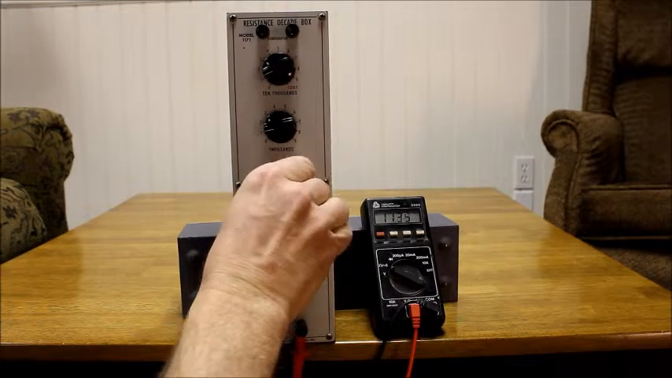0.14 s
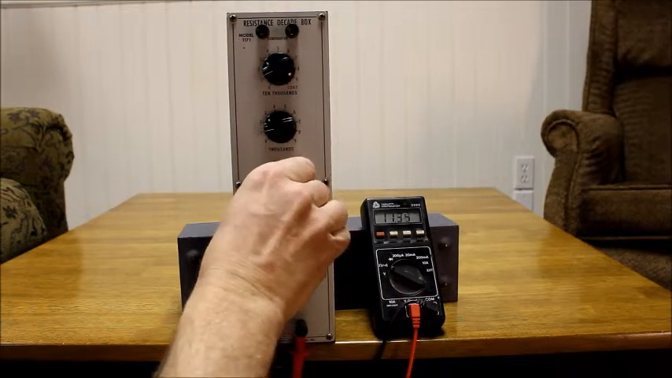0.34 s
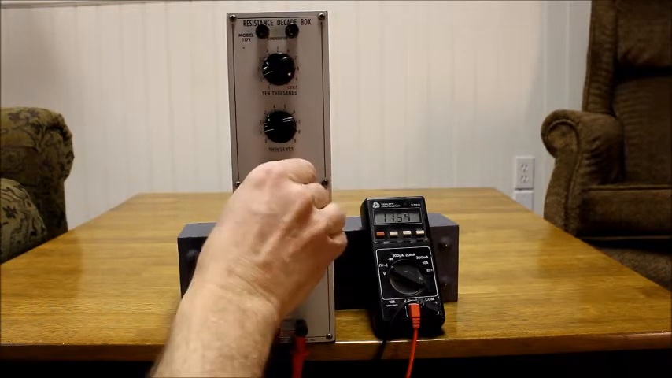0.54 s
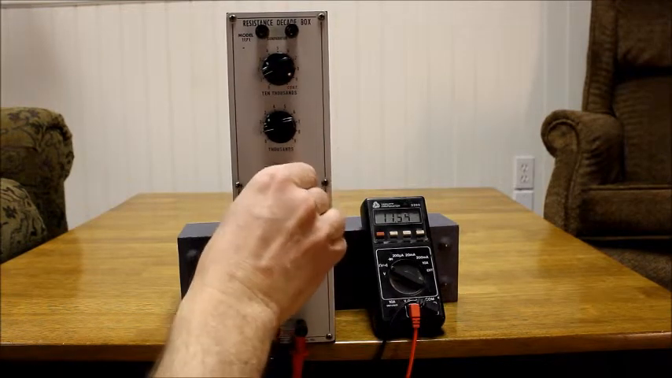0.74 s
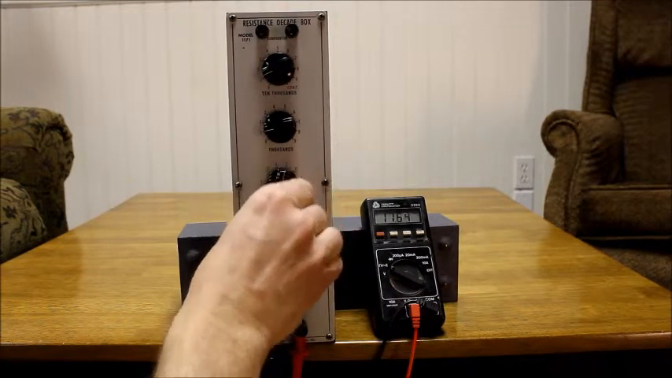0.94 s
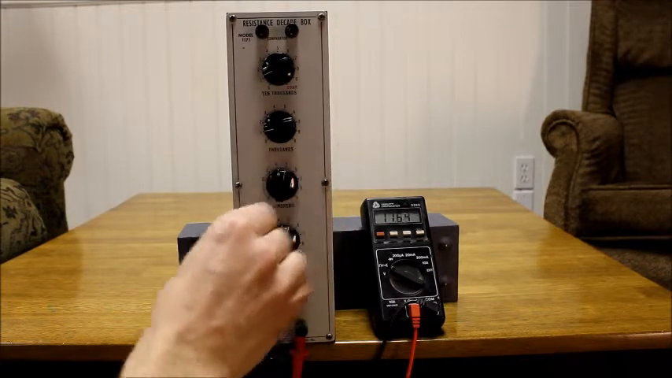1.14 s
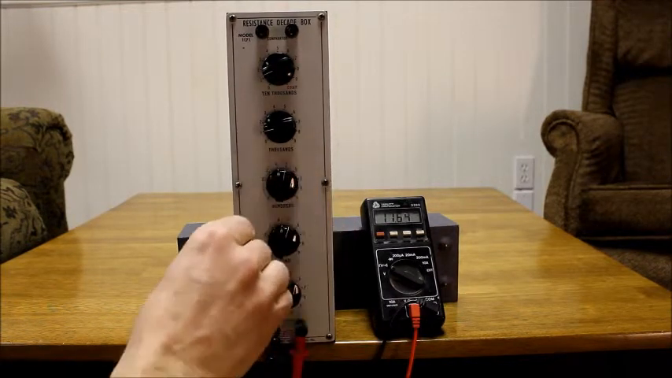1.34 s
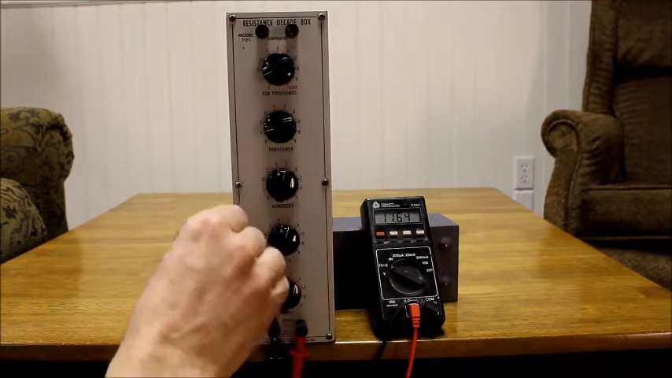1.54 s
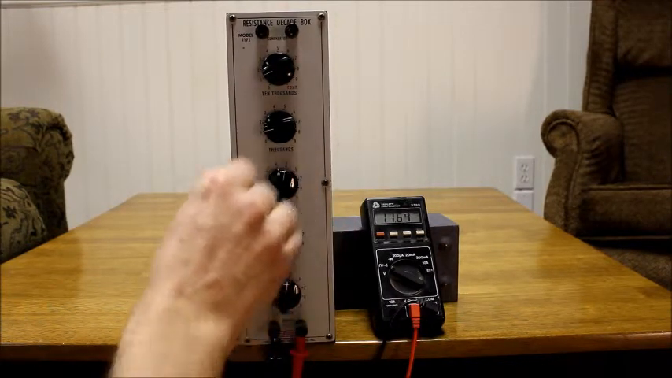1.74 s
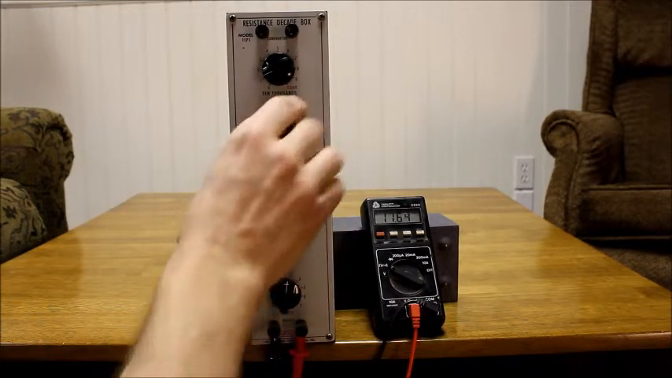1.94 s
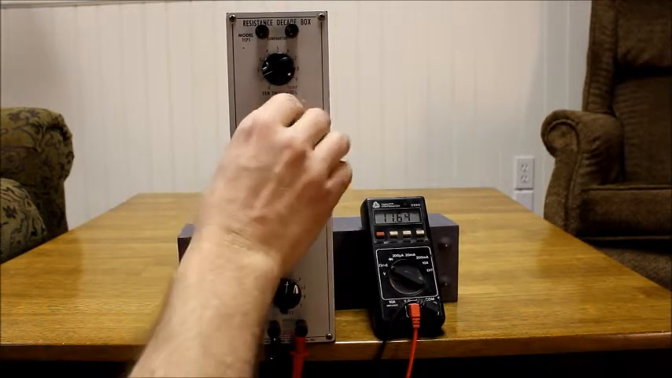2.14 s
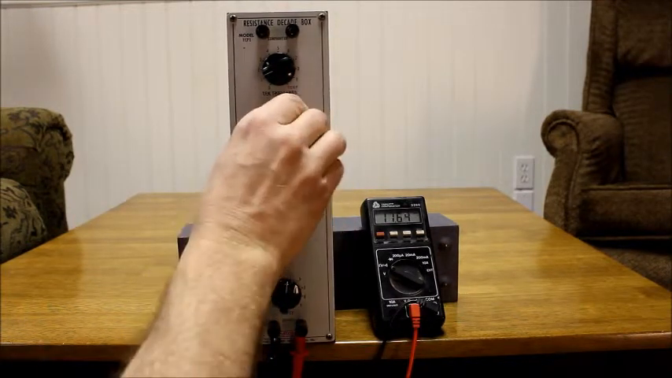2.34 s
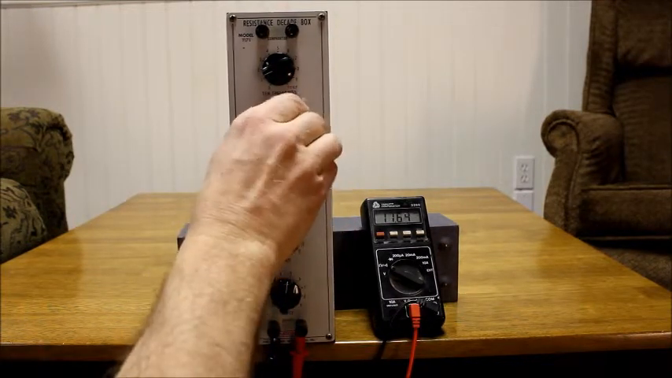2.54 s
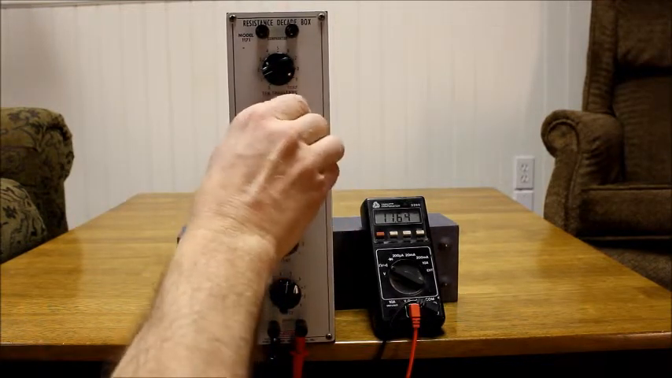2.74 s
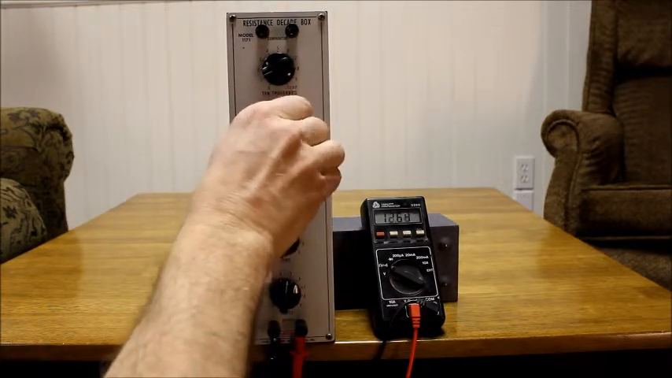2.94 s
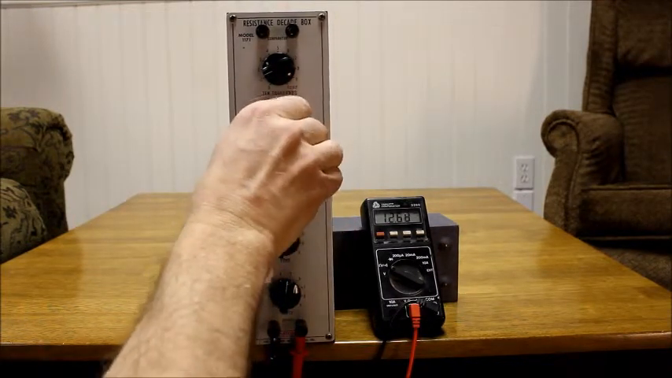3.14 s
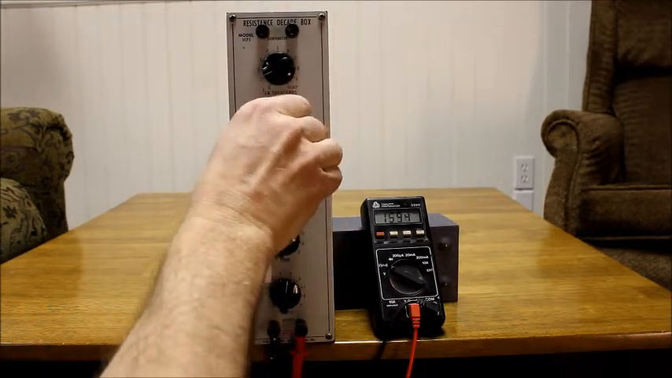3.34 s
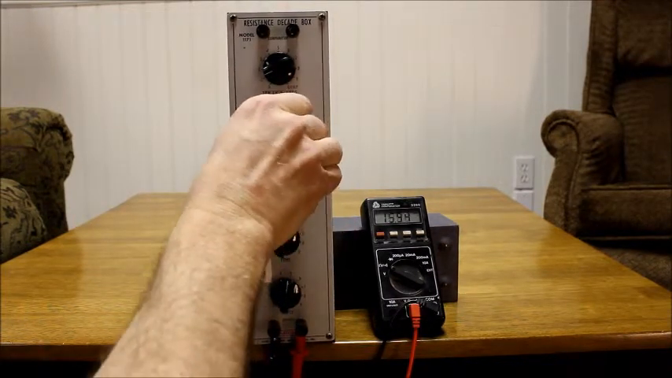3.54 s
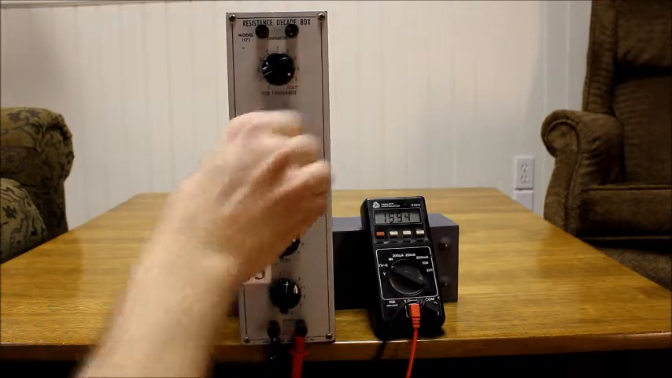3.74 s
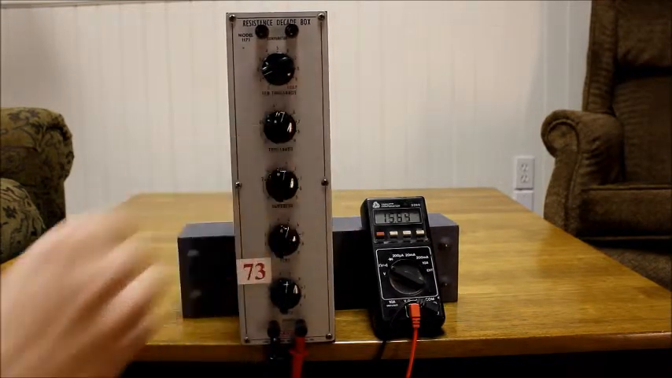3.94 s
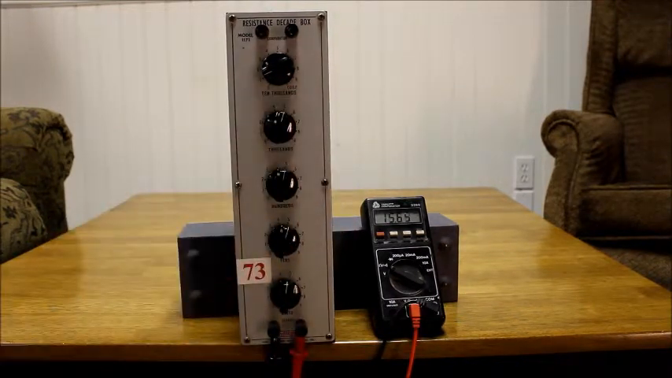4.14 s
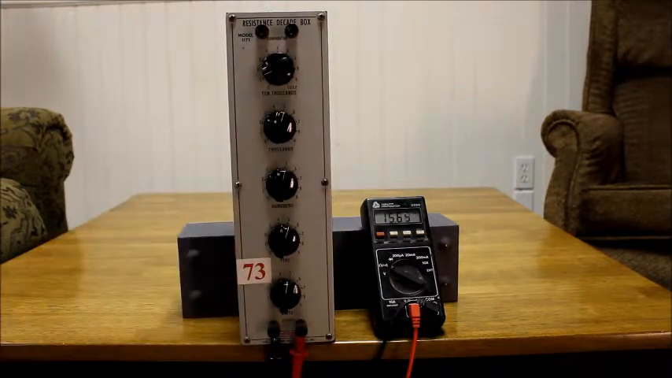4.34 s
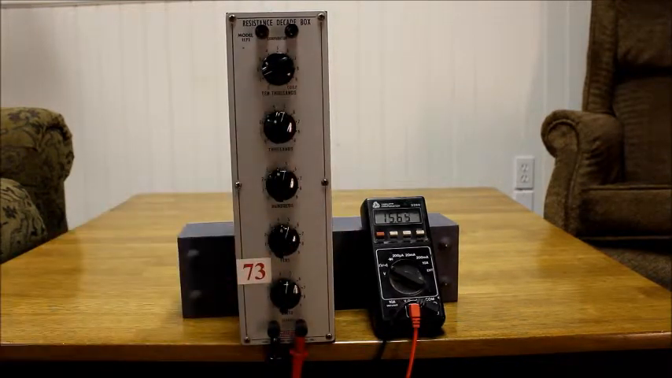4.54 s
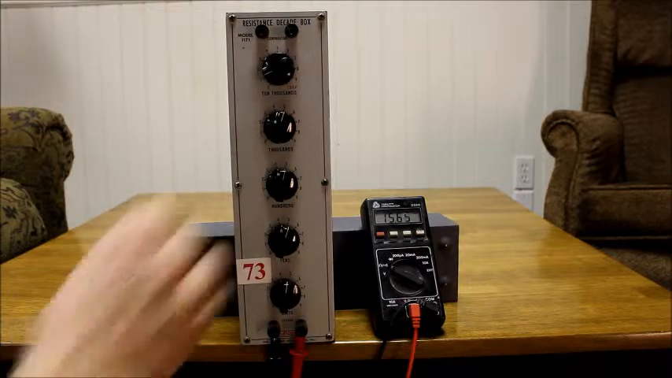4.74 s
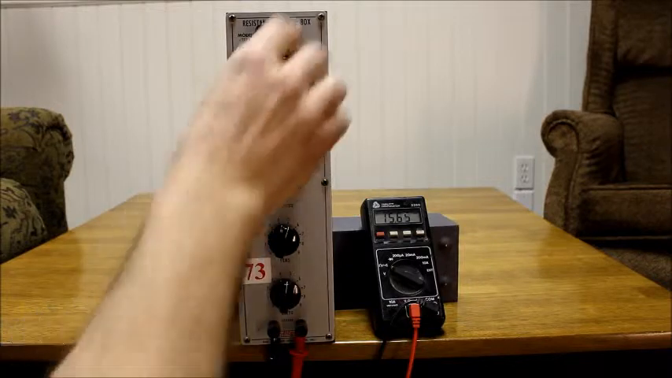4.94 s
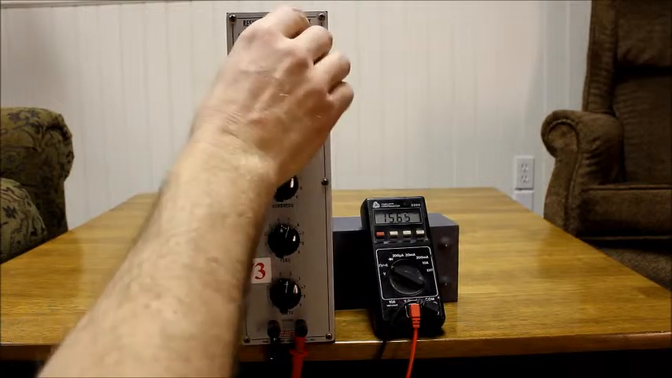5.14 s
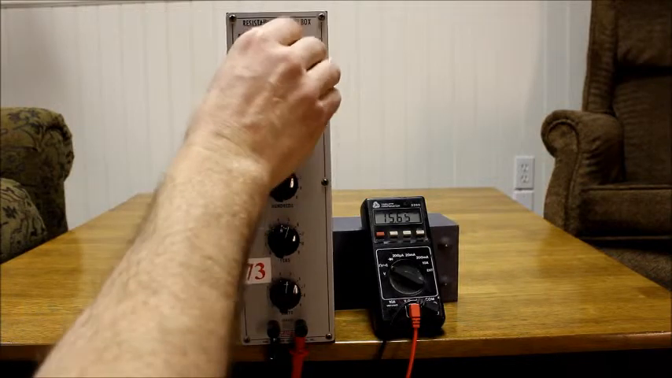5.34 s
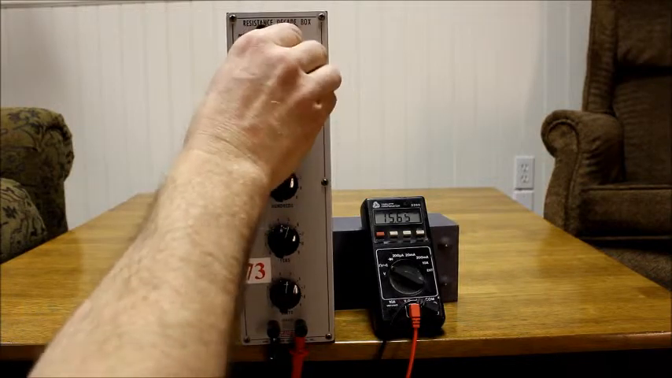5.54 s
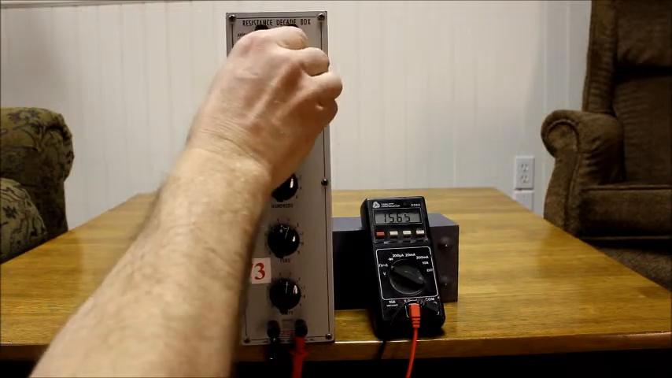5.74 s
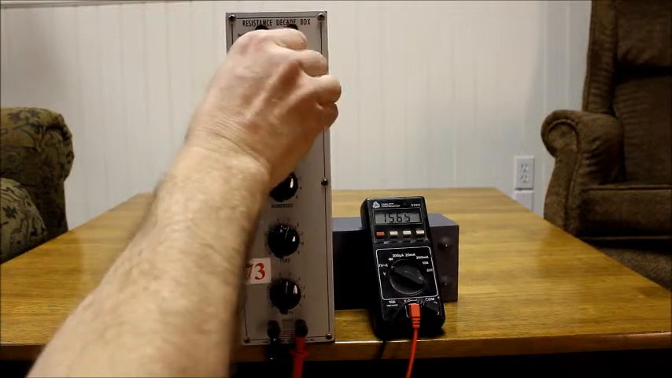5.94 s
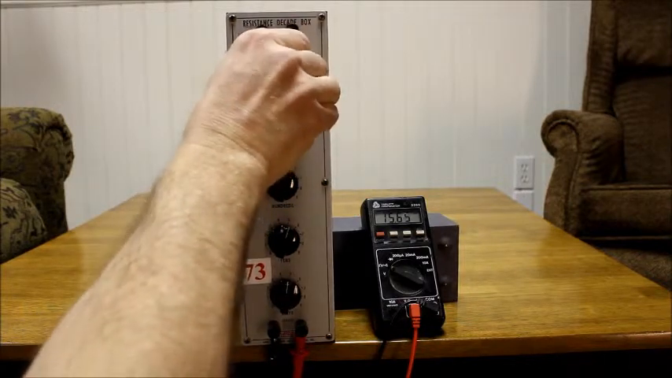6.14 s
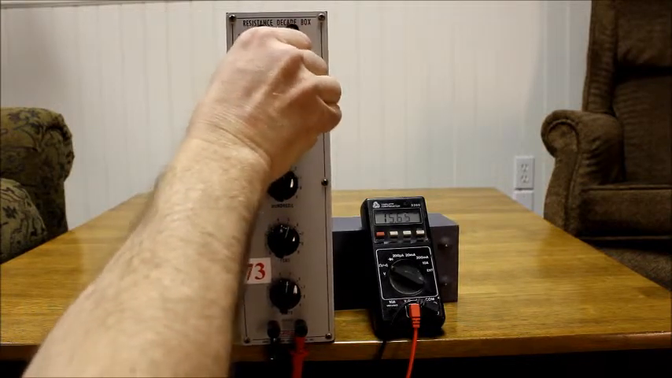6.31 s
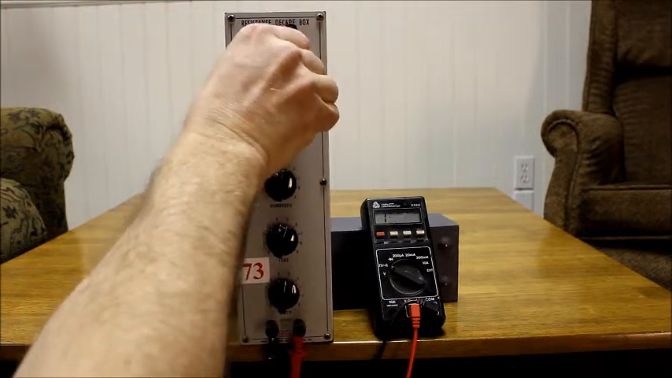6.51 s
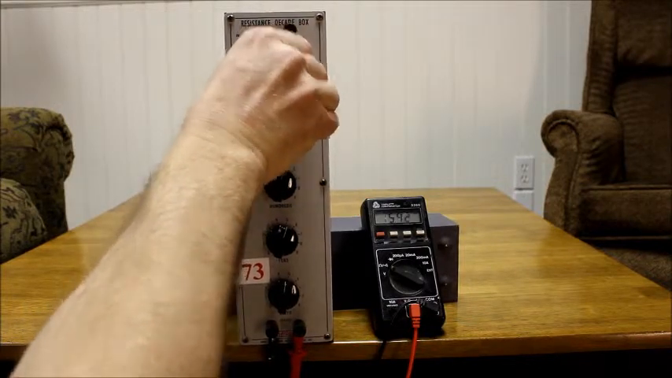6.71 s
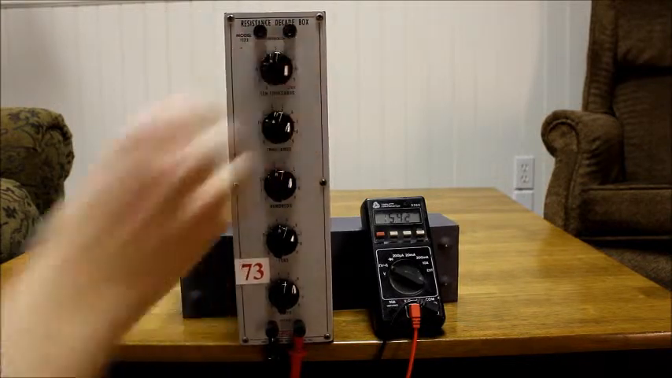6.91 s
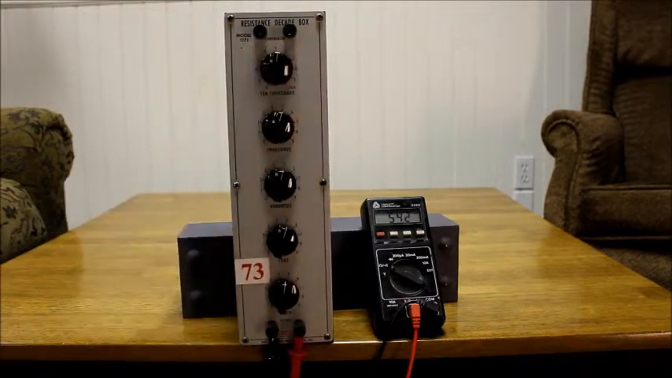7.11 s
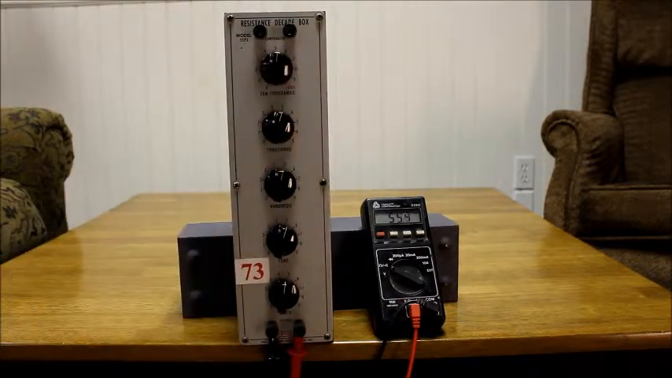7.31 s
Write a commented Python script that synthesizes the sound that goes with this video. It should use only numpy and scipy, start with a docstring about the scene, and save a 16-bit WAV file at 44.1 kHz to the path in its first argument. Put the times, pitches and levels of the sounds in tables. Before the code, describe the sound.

A hand turns rotary switches on a metal box standing on a wooden table, close to the microphone. Two sharp, bright clicks sound at about 0.2 and 0.5 seconds, each with a brief ring from the panel. After a pause and a small tick at 2.4 seconds, a second switch snaps four times between 2.6 and 3.5 seconds, evenly paced, with a thin springy rattle. The box rocks against the table with hollow knocks, strongest near 2.7 seconds. Faint finger taps and soft bumps come around 5.3 seconds. A third switch then clicks four times from 5.8 to 6.6 seconds, the first click joined by another low knock. Fingers leave the knob with a light tick and bump at 6.8 seconds, and one fainter tick follows near 7.2. The small furnished room gives short reflections over a quiet, steady low rumble.

```python
"""Three rotary switches of a metal resistance box, turned by hand on a wooden table, close to one microphone.
At each detent a sprung ball scrapes over the cam and snaps home, ringing the switch and the panel.
Stiff turns rock the box against the table, and fingers tick on the knobs.
The place is a small furnished room: a short answer from the walls over a low steady rumble."""
import sys
import numpy as np
from scipy import signal
from scipy.fft import rfft, irfft, next_fast_len
from scipy.io import wavfile
from scipy.ndimage import uniform_filter1d

SR = 44100
rng = np.random.default_rng(int(sys.argv[2]) if len(sys.argv) > 2 else 0)


def waveform_to_disk(signal):
    """Save audio, clipped to [-1, 1], as 16-bit WAV at the path in sys.argv[1]."""
    frames = np.transpose(np.atleast_2d(signal))
    scaled = np.clip(frames, -1, 1) * 32767
    samples = np.round(scaled).astype(np.int16)
    wavfile.write(sys.argv[1], SR, samples)


N = 329427
RING_T = np.arange(2 ** 15) / SR  # time axis of one decay, t/s

# spectral shape of the room's rumble and hiss: (f/Hz, relative level/dB)
RUMBLE_COLOUR = [(15, -36), (25, -13), (43, -25.5), (59, -6), (108, -1), (217, -11.5), (317, -11),
                 (384, -16.5), (427, -13), (677, -21), (863, -21), (1190, -27), (1290, -26.5),
                 (14800, -39.5), (16000, -32.5)]
# faint hum and a thin electronic whine: (f/Hz, level/dB)
HUM_TONES = [(102.3, -80), (420, -66), (15735, -77)]
# first a low ring of the box dying away at the start, then its knocks on the table:
# (t/s, level/dB, tilt/dB per octave)
BOX_RINGS = [(0.002, -17, -4), (2.389, -17.5, 5), (2.638, -7.5, -9), (2.669, 0, -0.5), (2.894, -6, 3.5),
             (3.183, -9, -2.5), (3.48, -18.5, -7), (5.26, -20, -12.5), (5.322, -14.5, -2),
             (5.400, -14.5, -5), (5.757, -4, -6.5), (5.781, -1.5, 2), (6.051, -12, -1), (6.34, -10.5, -1.5),
             (6.647, -19, -6), (6.786, -16, -4), (6.826, -26, -11)]
# modes of box and table top: (f/Hz, peak gain/dB, t60/s)
BOX_MODES = [(162, 2, 0.61), (173.3, 27, 0.16), (200, 25.5, 0.13), (225, 10.5, 0.14), (281.5, 15, 0.055),
             (334, 12.5, 0.08), (367.2, 14, 0.11), (433, 16, 0.086), (512, 12, 0.11), (530.5, 11.5, 0.11),
             (609, 9.5, 0.24), (660, 9.5, 0.16), (719, 14.5, 0.11), (880, 7, 0.21)]
# dull thud of the box: (f/Hz, gain/dB)
THUD_COLOUR = [(100, -8), (125, 0), (175, 11), (250, -8), (600, 3), (1000, -2), (1800, -15), (4000, -30),
               (16000, -50)]
# the hand holds a knob: (start/s, end/s, tremor level/dB)
GRIPS = [(0.0, 1.6, -76.5), (2.4, 2.7, -58), (5.0, 7.1, -58)]
# the ball snaps into a notch: (t/s, knob index, snap level/dB, tilt/dB per octave, panel level/dB,
# then f/Hz, gain/dB for each of the notch's clack, knock, bite, zing and hollow)
DETENTS = [ (0.1644, 0, 6.5, 1, -6, 1740, -13, 2440, 6, 2880, 12, 5060, 10, 4170, -11),
           (0.4765, 0, 6.5, 0.5, -1.5, 1750, 5, 3230, 9, 3600, 6.5, 7100, 2.5, 1050, -5),
           (2.6340, 1, 6, -0.5, -1.5, 1200, 2, 2700, 2, 4340, 3.5, 6860, 8, 1800, 1.5),
           (2.8916, 1, 4, -1, -4.5, 1220, 16.5, 2500, 3.5, 3700, 7, 7000, 8, 910, -13),
           (3.1805, 1, 5.5, 0, -1.5, 1310, 8.5, 2500, 8, 3450, 10.5, 7500, 8, 1680, 2),
           (3.4768, 1, 5.5, -0.5, -6, 1260, 11.5, 2420, -1, 3400, 5, 6900, 7.5, 5300, -2),
           (5.7539, 2, 0, -0.5, -10, 1290, -6, 3980, 8.5, 5270, 4, 7200, 9.5, 11000, -12),
           (5.7571, 2, -3, -3.5, -4, 1230, 12.5, 1640, 7, 2760, 9, 5500, 1, 1000, -6),
           (6.0327, 2, -1, -2, -2.5, 1220, 11.5, 1540, 1, 2700, 5, 7300, 16, 4530, -6),
           (6.32, 2, 3.5, -1, 0, 1520, 8, 2780, 4, 5200, 7, 6840, 13, 2200, -7),
           (6.6247, 2, -0.5, 2, -0.5, 1510, -5, 3080, -3, 4640, 5.5, 7300, 13.5, 2200, 3.5),
           (6.6278, 2, -7, -1.5, -16, 1290, 17.5, 1560, 16, 2955, 9, 6300, 5, 950, -5), ]
# clack, knock, bite, zing and hollow: half width/octaves of each
NOTCH_WIDTHS = [0.092, 0.11, 0.14, 0.12, 0.16]
# per switch: (snap t60/s, chatter level/dB re snap, rattle f/Hz, rattle level/dB re snap, rattle t60/s)
SWITCH_ACTION = [(0.0183, -8, 2200, -20, 0.069), (0.01276, -10, 6340, -3, 0.15),
                 (0.0314, -5, 4100, -6, 0.11)]
# the band in which a spring rattles: (multiple of its centre, gain/dB)
RATTLE_BAND = [(0.6, -24), (0.9, -4.5), (1.1, 1.5), (1.3, -26)]
# crowded high modes, one list per switch: (f/Hz, gain/dB)
SWITCH_COLOUR = [
    [(200, -22), (700, -6), (1000, -9), (1350, -1.5), (2200, 1), (4300, 0), (6200, 0), (8500, 0.5),
     (11000, -2.5), (13200, 4.5), (16000, 1)],
    [(200, -9), (900, -0.5), (1800, -4), (2600, 0), (4900, 0.5), (7200, -0.5), (10500, 0), (12000, -3),
     (14000, -6), (16000, -8)],
    [(200, -5.5), (600, 0.5), (950, -7.5), (1350, 2.5), (1950, -5), (2800, 0), (3600, 0), (4800, 1.5),
     (7300, -3), (8700, -3), (13000, -1.5), (16000, -5)],
]
# modes that ring with each switch, one list per switch: mostly the surrounding panel, while the long rings near
# 600 Hz are a resonance of the room: (f/Hz, peak gain/dB, t60/s)
PANEL_MODES = [
    [(390, 13.5, 0.038), (457, 15, 0.036), (603, 15, 0.35), (634, 18.5, 0.29), (663, 4, 0.16)],
    [(434.6, 12.5, 0.046), (573, 13.5, 0.13), (607, 19.5, 0.38), (683, 19.5, 0.048), (751, 18, 0.057),
     (1567, 8, 0.098), (7130, 19, 0.06)],
    [(274, 12, 0.035), (404, 13, 0.076), (441, 16.5, 0.11), (523, 12.5, 0.064), (738, 9, 0.1),
     (1535, 11.5, 0.045)],
]
# fingers tap and leave the knobs: (t/s, level/dB)
TOUCHES = [(0.449, -27), (3.688, -27), (5.235, -24.5), (5.400, -24), (5.413, -26), (6.821, -15),
           (7.239, -22)]
# tone of a finger on a knob: (f/Hz, gain/dB)
TOUCH_COLOUR = [(200, 6), (1300, 7), (1800, 3.5), (2400, 6), (2900, 12), (3500, 1), (4500, 1.5),
                (8000, -16), (16000, -11)]
# ticks of the ball against its notch and, at 2.669 s, a dull crack as the box knocks on the table:
# (t/s, knob index, level/dB, tilt/dB per octave)
TICKS_AND_CRACK = [(2.3898, 1, -11.5, 1), (2.669, 1, -9.5, -7.5), (5.770, 2, -6.5, -0.5), (6.04, 2, -3, -2),
                   (6.364, 2, -15, 0)]
# quick reflections from table and walls: (f/Hz, gain/dB)
REFLECTION_COLOUR = [(120, -5), (450, 4.5), (1000, -4), (2500, -5), (7000, -18.5), (11000, -24),
                     (16000, -44)]
# the room's lingering low ring: (f/Hz, gain/dB)
LINGER_COLOUR = [(120, 0.5), (300, 0.5), (600, -3.5), (1200, -19.5), (3000, -33), (7000, -27), (16000, -47)]


def undb(db):
    """Decibels to gain."""
    return 10 ** (np.asarray(db) / 20)


def add(track, start_s, sound):
    """Mix a sound into the track at a time."""
    i = int(start_s * SR)
    track[i:i + len(sound)] += sound[:len(track) - i]


def fade(t60):
    """Exponential decay that loses 60 dB in t60 seconds."""
    return np.exp(-np.log(1000) * RING_T / t60)


def colour(x, points, tilt_db=0, pivot_hz=4000):
    """Causal filter through (f/Hz, gain/dB) points, tilted for two octaves each side of a pivot."""
    size = 2 * next_fast_len(len(x), True)
    octave = np.log2(np.maximum(np.fft.rfftfreq(size, 1 / SR), 1))
    hz, db = np.transpose(points)
    curve_db = np.interp(octave, np.log2(hz), db) + tilt_db * np.clip(octave - np.log2(pivot_hz), -2, 2)
    cepstrum = irfft(np.log(undb(curve_db)))
    cepstrum[1:size // 2] *= 2  # fold to minimum phase
    cepstrum[size // 2 + 1:] = 0
    return irfft(rfft(x, size) * np.exp(rfft(cepstrum)))[:len(x)]


def burst(envelope, passes=4):
    """Random burst of unit energy under an envelope, spread evenly over all frequencies."""
    x = rng.standard_normal(len(envelope)) * envelope
    for _ in range(passes):
        spectrum = rfft(x)
        x = irfft(spectrum / (np.abs(spectrum) + 1e-12), len(x))
        x *= envelope / np.sqrt(np.abs(uniform_filter1d(x ** 2, size=64)) + 1e-18)
    return x / np.sqrt(np.sum(x ** 2))


def ring(modes, sign=-1, detune=0.01):
    """Struck modes; neighbours swing against each other (sign -1) or start together (sign 1)."""
    out = 0
    for k, (hz, peak_db, t60) in enumerate(modes):
        amplitude = sign ** k * undb(peak_db) * 2 * np.log(1000) / (t60 * SR)
        hz = hz * (1 + detune * rng.standard_normal())  # the grip shifts each mode slightly
        out = out + amplitude * fade(t60) * np.sin(2 * np.pi * hz * RING_T)
    return out


def room_tone(rumble_db=-47.5, waver=0.44):
    """Steady rumble and hiss around the microphone, with a few faint wavering tones."""
    t = np.arange(N) / SR
    noise = colour(rng.standard_normal(N), RUMBLE_COLOUR)
    out = undb(rumble_db) * noise / np.std(noise)
    knots_s = np.arange(0, N / SR + 1, 0.1)
    for hz, db in HUM_TONES:
        swell = np.interp(t, knots_s, waver * rng.standard_normal(len(knots_s)))
        drift = np.interp(t, knots_s, waver * rng.standard_normal(len(knots_s)))
        out += undb(db) * np.sqrt(2) * (1 + swell) * np.sin(2 * np.pi * hz * t + 2 * drift)
    return out


def hand_tremor(t60_scale=0.27, ease_s=0.029):
    """The gripping hand shakes the box's low modes and damps them as it does so."""
    t = np.arange(N) / SR
    damped_modes = [(hz, db, t60_scale * t60) for hz, db, t60 in BOX_MODES]
    tremor = signal.fftconvolve(rng.standard_normal(N), ring(damped_modes))[:N]
    grip = sum(undb(db) * np.clip(np.minimum(t - start, end - t) / ease_s, 0, 1)
               for start, end, db in GRIPS)
    return grip * tremor / np.std(tremor)


def box_rings(contact_s=0.00067, thud_t60=0.025, pivot_hz=300):
    """Box and table top ring low over a dull thud: dying away at the start, later at each knock."""
    out = np.zeros(N)
    attack = 1 - np.exp(-RING_T / contact_s)
    for at_s, db, tilt_db in BOX_RINGS:
        modes = [(hz, peak_db + tilt_db * np.log2(hz / pivot_hz), t60) for hz, peak_db, t60 in BOX_MODES]
        add(out, at_s, undb(db) * ring(modes, sign=1, detune=0.012) * attack)
        add(out, at_s, undb(db) * colour(burst(fade(thud_t60)), THUD_COLOUR))
    return out


def notch_colour(resonances):
    """A notch's broad resonances and hollow, drawn as (f/Hz, gain/dB) points."""
    grid_hz = np.geomspace(200, 16000, 200)
    curve_db = sum(db * np.exp(-0.5 * (np.log2(grid_hz / hz) / width) ** 2)
                   for hz, db, width in zip(resonances[::2], resonances[1::2], NOTCH_WIDTHS))
    return np.transpose([grid_hz, curve_db])


def detents(rise_s=0.00024, seat_t60=0.0084, chatter_t60=0.14, scrape_db=-32, scrape_t60=0.016):
    """The ball scrapes up the cam, snaps into the notch and sets spring, wipers and panel ringing."""
    out = np.zeros(N)
    attack = 1 - np.exp(-RING_T / rise_s)
    for at_s, knob, snap_db, tilt_db, panel_db, *resonances in DETENTS:
        snap_t60, chatter_db, rattle_hz, rattle_db, rattle_t60 = SWITCH_ACTION[knob]
        snap = colour(burst(fade(snap_t60) * attack), notch_colour(resonances))
        settling = 1 - fade(snap_t60)  # wipers and spring settle after the blow
        chatter = undb(chatter_db) * burst(fade(chatter_t60) * settling)
        spring_band = [(ratio * rattle_hz, db) for ratio, db in RATTLE_BAND]
        rattle = undb(rattle_db) * colour(burst(fade(rattle_t60) * settling), spring_band)
        add(out, at_s, undb(snap_db) * colour(snap + chatter + rattle, SWITCH_COLOUR[knob], tilt_db))
        # the ball seats itself in tiny bounces, which drive the panel
        seating = burst((fade(seat_t60) * attack)[:SR // 100])
        panel = signal.fftconvolve(ring(PANEL_MODES[knob], detune=0.015), seating)
        add(out, at_s, undb(panel_db) * panel)
        # the scrape swells up to the snap as the ball speeds over the crest
        scrape = colour(burst(fade(scrape_t60)[:SR // 20])[::-1], SWITCH_COLOUR[knob])
        add(out, at_s - len(scrape) / SR, undb(snap_db + scrape_db) * scrape)
    return out


def fingers(t60=0.073):
    """Small ticks as the fingers take up the play of a knob."""
    out = np.zeros(N)
    for at_s, db in TOUCHES:
        add(out, at_s, undb(db) * burst(fade(t60)))
    return colour(out, TOUCH_COLOUR)


def ticks_and_crack(t60=0.0081):
    """Ticks of the ball, and one dull crack of the box on the table, briefly sound a switch's modes."""
    out = np.zeros(N)
    for at_s, knob, db, tilt_db in TICKS_AND_CRACK:
        add(out, at_s, undb(db) * colour(burst(fade(t60)), SWITCH_COLOUR[knob], tilt_db))
    return out


def room(direct, near_t60=0.105, linger_t60=0.41, build_s=0.00436):
    """Table and walls reflect to the microphone within milliseconds; the lows stay longest."""
    build = 1 - np.exp(-(RING_T / build_s) ** 2)
    near = colour(burst(build * fade(near_t60)), REFLECTION_COLOUR)
    linger = colour(burst(build * fade(linger_t60)), LINGER_COLOUR)
    return direct + signal.fftconvolve(direct, near + linger)[:N]


def scene(lowest_hz=125):
    """The box close up, in mono, with the room behind it; the vibration of the box is cut below the lowest
    pitch."""
    vibration = detents() + ticks_and_crack() + box_rings() + hand_tremor() + fingers()
    low_cut = signal.butter(3, lowest_hz, "high", fs=SR, output="sos")
    direct = signal.sosfilt(low_cut, vibration)
    return (room(direct) + room_tone())[None]


def record(dry, top_hz=15880):
    """The recorder cuts the very top of the microphone's signal."""
    return signal.sosfilt(signal.ellip(10, .2, 70, top_hz, fs=SR, output="sos"), dry)


dry = scene()
out = record(dry)
waveform_to_disk(out)
```